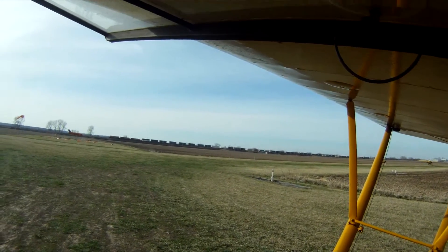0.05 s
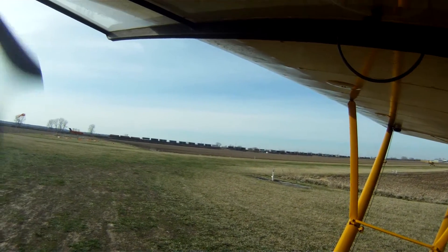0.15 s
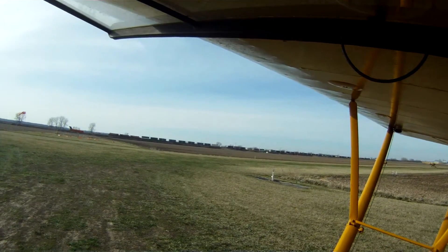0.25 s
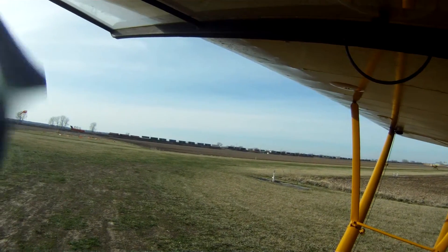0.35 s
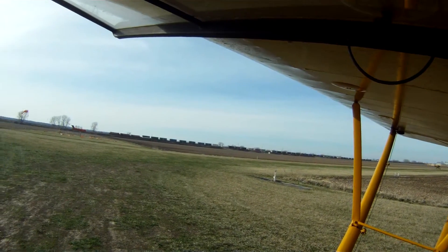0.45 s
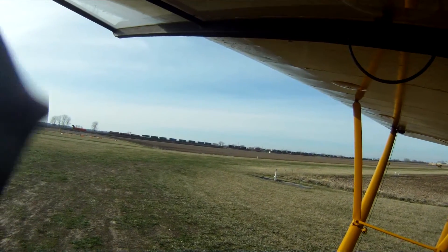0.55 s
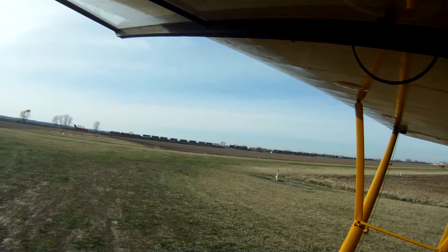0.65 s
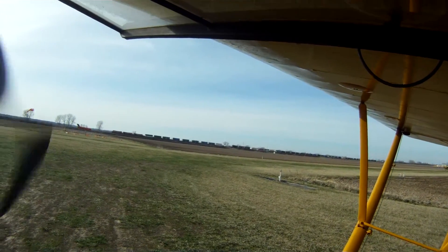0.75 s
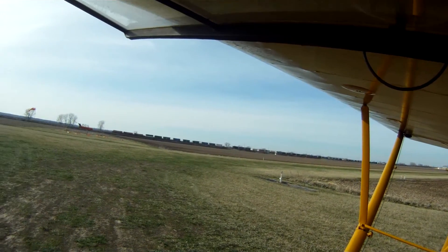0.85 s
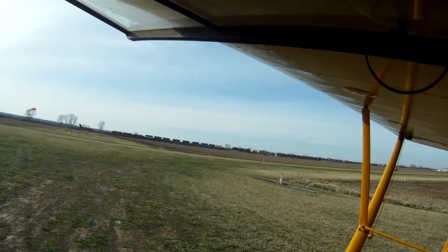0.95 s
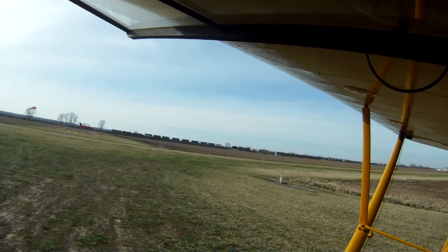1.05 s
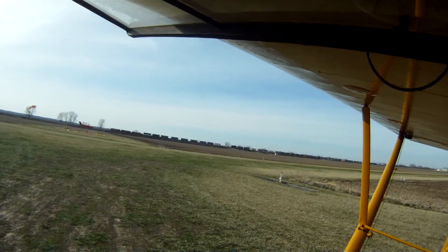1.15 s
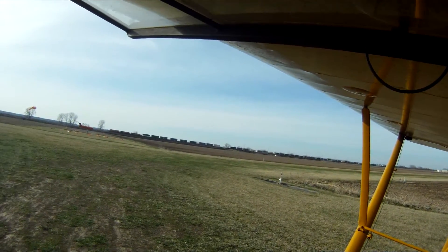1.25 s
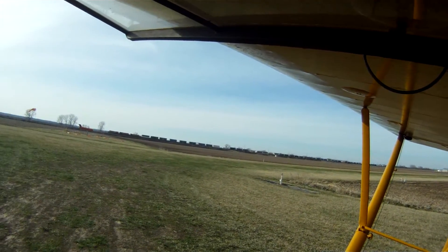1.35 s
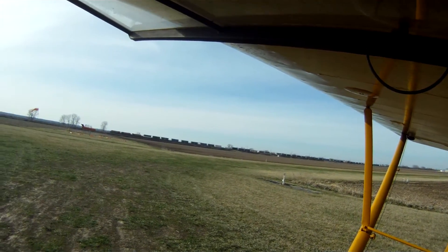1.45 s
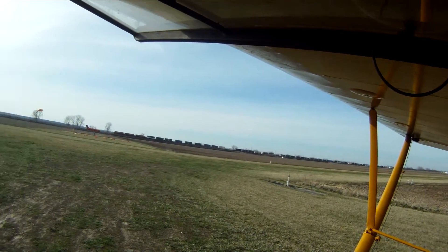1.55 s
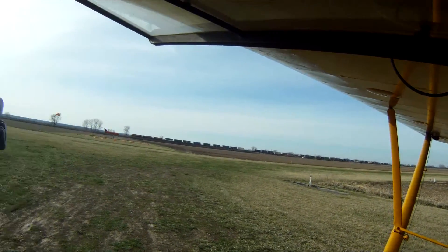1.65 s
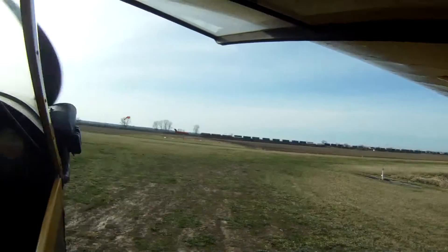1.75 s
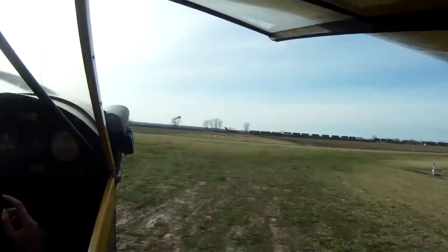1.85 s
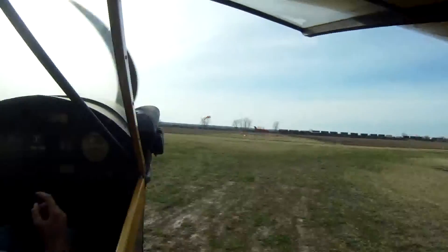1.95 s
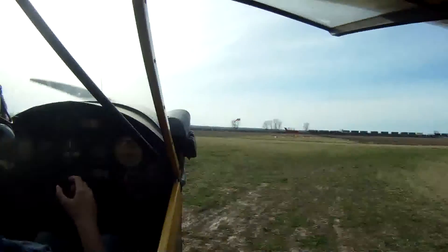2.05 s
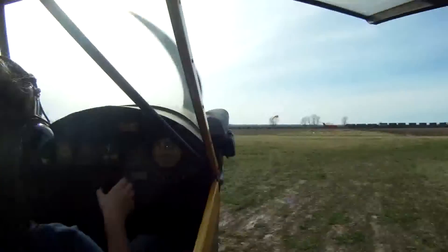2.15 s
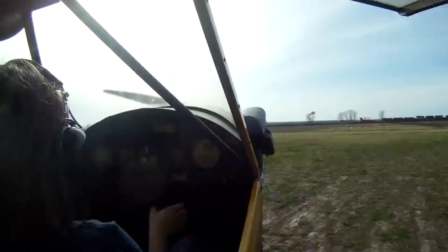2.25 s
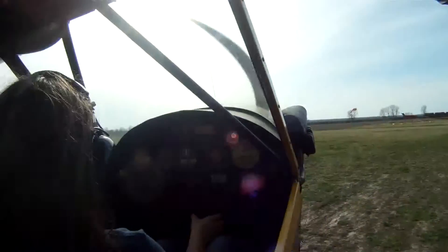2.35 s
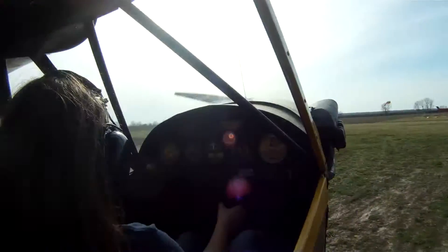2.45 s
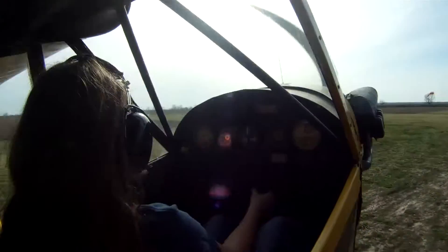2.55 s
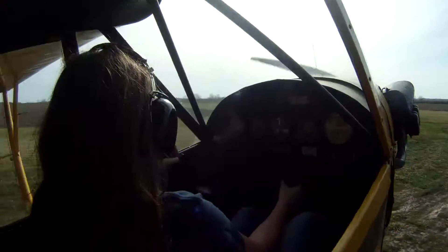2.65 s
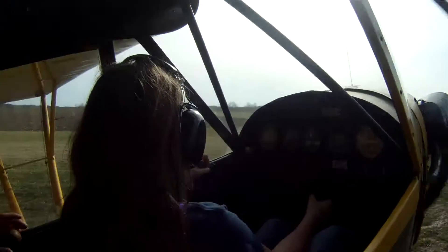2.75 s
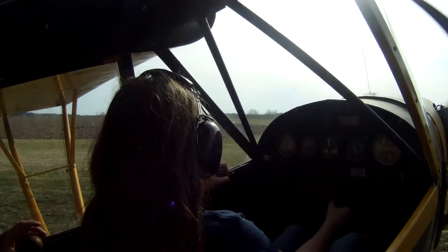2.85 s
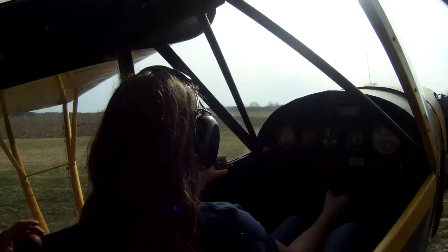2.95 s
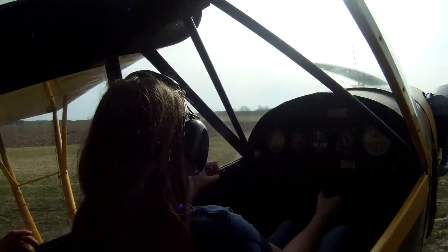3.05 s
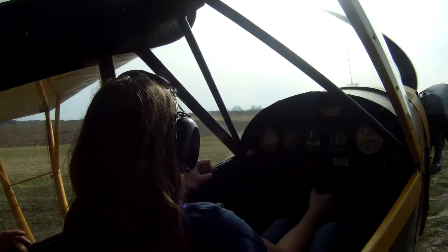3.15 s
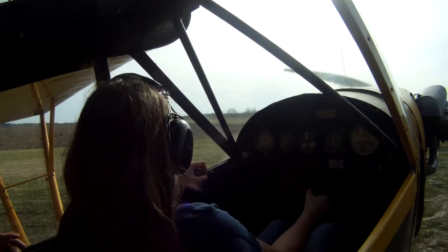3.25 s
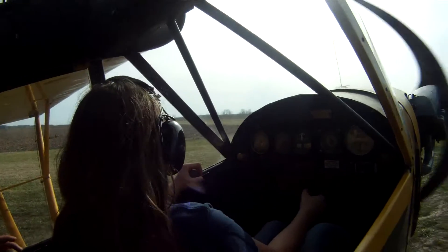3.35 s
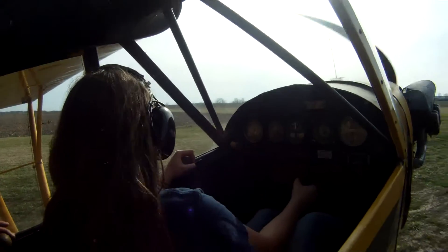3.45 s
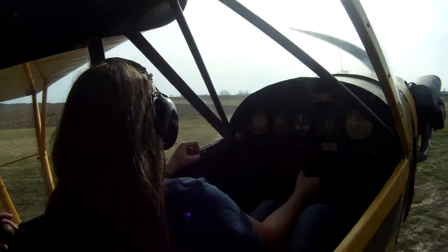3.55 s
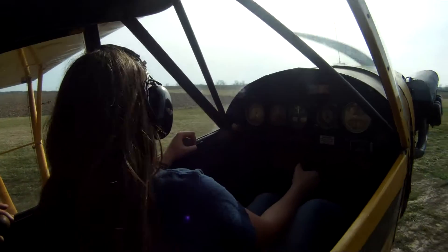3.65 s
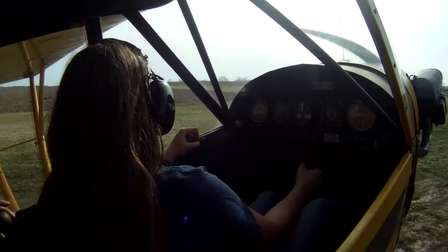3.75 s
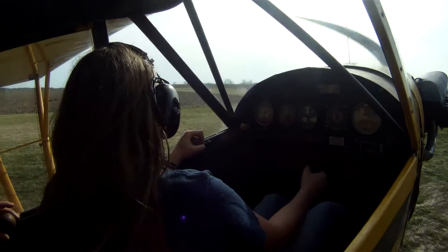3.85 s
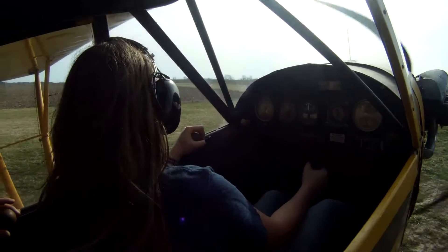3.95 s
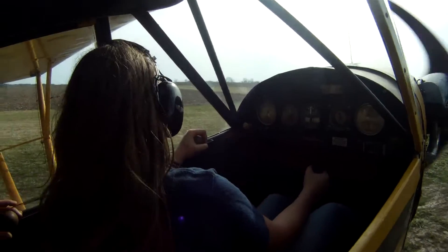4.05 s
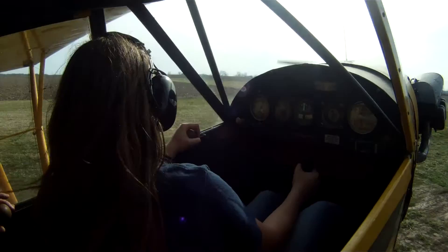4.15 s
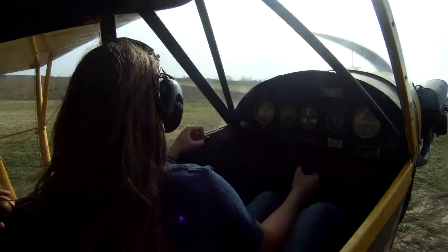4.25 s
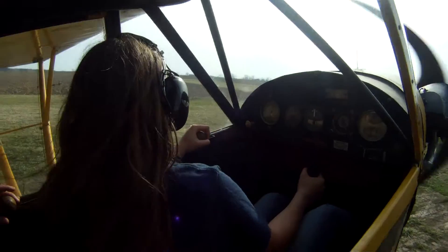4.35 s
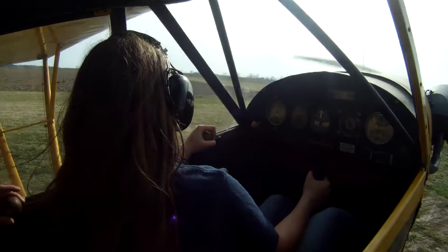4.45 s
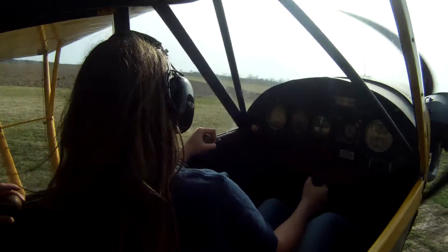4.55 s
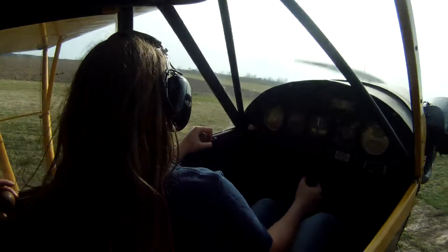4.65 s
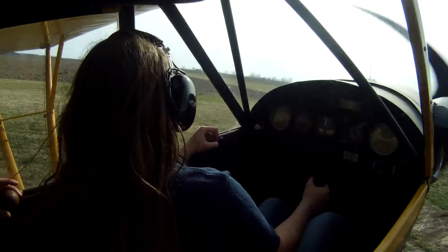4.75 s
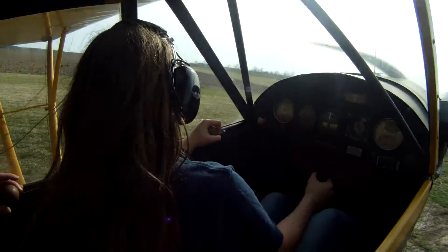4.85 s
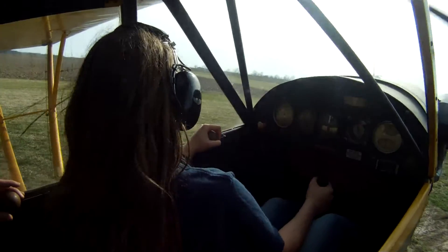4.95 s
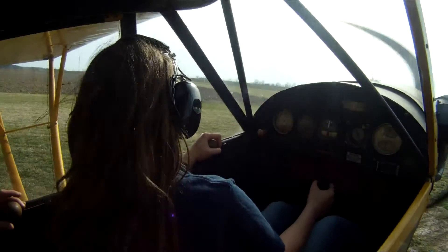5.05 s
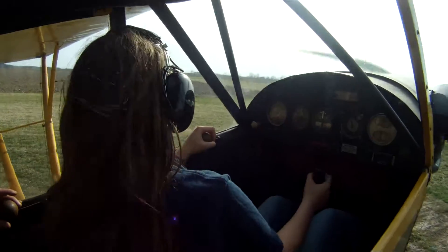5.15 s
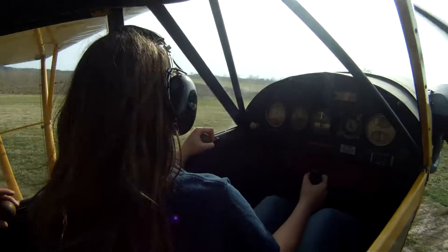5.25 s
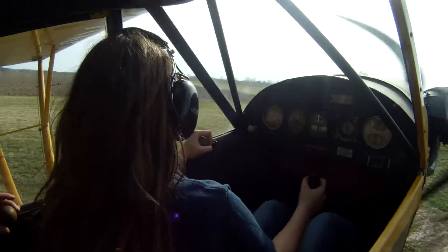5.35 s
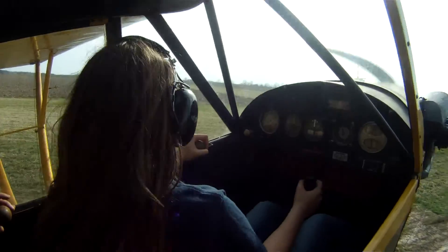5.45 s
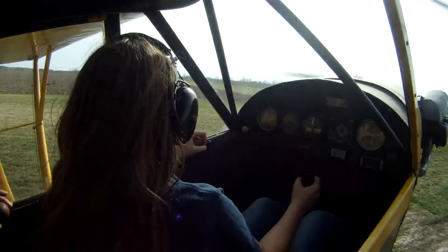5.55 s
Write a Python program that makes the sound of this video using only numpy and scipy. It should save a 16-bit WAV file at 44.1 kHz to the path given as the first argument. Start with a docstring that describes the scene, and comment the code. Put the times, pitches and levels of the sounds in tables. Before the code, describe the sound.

From the open door of a light aircraft, the engine ticks over with a steady throb, faint knocking and rhythmic puffs of propeller air. Then it revs up towards full power, climbing in pitch and loudness. Bass buffeting suddenly hits the microphone, the hiss becomes a coarse, fluttering rush with a breathy whistle in it, and scattered cabin rattles and dull wind thumps break through.

```python
"""On grass, at the open cockpit door of a light aircraft: it idles, then opens up to full throttle.
Each propeller blade throws a slug of air over the microphone, hissing in the resonances of its port
and buffeting the bass. Underneath, the exhaust throbs and every firing knocks in the cabin.
As the speed rises the wash turns rough and gusty: it swishes across the port and sets it singing,
the cabin rattles, and single eddies thump the diaphragm."""
import sys
import numpy as np
from scipy import signal
from scipy.fft import rfft, irfft, next_fast_len
from scipy.io import wavfile

SR = 44100
rng = np.random.default_rng(int(sys.argv[2]) if len(sys.argv) > 2 else 0)


def unload_wav(signal):
    """Save mono or channel-first audio to the path in sys.argv[1] as 16-bit WAV at rate SR, clipped to [-1, 1]."""
    wavfile.write(
        sys.argv[1],
        SR,
        np.round(np.clip(np.atleast_2d(signal).T, -1, 1) * 32767).astype(np.int16),
    )


N = 247401
TIME = np.arange(N) / SR
SIZE = next_fast_len(N + SR // 4)
HZ = np.maximum(np.arange(SIZE // 2 + 1) * SR / SIZE, 1)


def from_db(db):
    """Decibels to gain."""
    return 10 ** (np.asarray(db) / 20)


def rms_one(x):
    """Scale to unit power."""
    return x / np.sqrt(np.mean(x ** 2) + 1e-20)


def eq_curve(points):
    """An EQ curve in dB, its points joined on a log-frequency axis."""
    hz, db = np.transpose(points)
    return np.interp(np.log(HZ), np.log(hz), db)


def bell(hz, width):
    """Power shape of one resonance, 1 on top."""
    return 1 / (1 + (2 * (HZ - hz) / width) ** 2)


def colour(x, db):
    """Play x through a minimum-phase EQ, which rings only after the sound."""
    cepstrum = irfft(np.log(from_db(db)), SIZE)
    cepstrum[1:SIZE // 2] *= 2
    cepstrum[SIZE // 2 + 1:] = 0
    return irfft(rfft(x, SIZE) * np.exp(rfft(cepstrum)), SIZE)[:N]


def drift(hz):
    """A smooth random modulator that rolls off above hz; RMS 1."""
    return rms_one(irfft(rfft(rng.standard_normal(SIZE)) / (1 + (HZ / hz) ** 2), SIZE)[:N])


def bump(centre_s, length_s):
    """A smooth fade in and out, 1 on top."""
    return np.exp(-np.minimum((2 * (TIME - centre_s) / length_s) ** 2, 20))


def fade_in(centre_s, length_s):
    """A smooth rise from 0 to 1."""
    return .5 + .5 * np.tanh(2 * (TIME - centre_s) / length_s)


def engine_speed(idle_hz, full_hz, throttle_s, lag_s):
    """Rate of blade passes, and of the four cylinders' firings: idle, then a glide towards full speed."""
    return full_hz - (full_hz - idle_hz) * np.exp(-np.maximum(TIME - throttle_s, 0) / lag_s)


def blade_throb(passes, phase, depth_db):
    """Tremolo in dB: the flow swings once per blade, reaching depth_db at this phase (0-1) of the pass."""
    return depth_db * np.cos(2 * np.pi * (passes - phase))


def slug_edge(passes, phase, width):
    """An edge of each slug shears the air: one short swell per pass, 1 on top."""
    return np.exp(-(np.sin(np.pi * (passes - phase)) / (np.pi * width)) ** 2)


def turbulence(swing_db, flicker_db, flicker_hz):
    """Churning air: noise whose level follows swing_db, with a random flicker on top."""
    return rng.standard_normal(N) * from_db(swing_db + flicker_db * drift(flicker_hz))


# Tone of gentle and of rough flow before the port: f/Hz, level/dB
GENTLE_FLOW_EQ = [(100, -39), (210, -7.5), (300, 2), (450, -2), (900, -8.5), (1700, -13.5), (2900, -15),
                  (4500, -17), (8000, -20), (12000, -27), (15300, -25)]
ROUGH_FLOW_EQ = [(100, -10.5), (220, 3), (400, 2.5), (900, 1), (1700, -6), (2900, -6), (4500, -8),
                 (8000, -13), (12000, -24.5), (15300, -24)]
# Peaks and notches of the microphone port: f/Hz, width/Hz, gentle-flow gain/dB, rough-flow gain/dB
PORT_RESONANCES = [(584, 450, 7, -4), (1257, 460, 18, 5.5), (2108, 1060, 26, 15), (3683, 810, 12.5, 7),
                   (5110, 570, 7, 2.5), (5996, 610, -10.5, -17.5), (6880, 630, 6.5, 2.5),
                   (8410, 730, 10.5, 8.5), (9886, 990, 23, 16.5), (10740, 290, 14.5, 8),
                   (12160, 390, -8, -22), (13640, 340, 11.5, 2.5), (14150, 1670, 17, 19)]
def port_colours():
    """The port stamps its resonances on the air: EQ curves in dB for gentle and for rough flow."""
    gentle_peaks = sum(db * bell(hz, width) for hz, width, db, _ in PORT_RESONANCES)
    rough_peaks = sum(db * bell(hz, width) for hz, width, _, db in PORT_RESONANCES)
    return eq_curve(GENTLE_FLOW_EQ) + gentle_peaks, eq_curve(ROUGH_FLOW_EQ) + rough_peaks


# Breathy tones of the port singing in fast air: f/Hz, width/Hz, relative level/dB
PORT_WHISTLES = [(1230, 130, 0), (2190, 260, 0), (3641, 130, -1), (8355, 170, -8)]
def port_hiss(passes, roughness, singing_db):
    """Gentle flow chugs in the mids and fizzes on top; rough flow is broader and sets the port singing."""
    gentle_eq, rough_eq = port_colours()
    mids = 1 / (1 + (HZ / 1750) ** 8)
    slug_db = blade_throb(passes, phase=.7, depth_db=3.7)
    # each slug has a front and a back, so the treble beats twice per pass
    edges_db = 5.4 * slug_edge(passes, phase=.53, width=.15) + 3.4 * slug_edge(passes, .97, .14)
    chug = turbulence(slug_db, flicker_db=-0.05, flicker_hz=630)
    fizz = turbulence(edges_db, flicker_db=0.7, flicker_hz=360)
    gentle = colour(chug, gentle_eq + 10 * np.log10(mids))
    gentle += colour(fizz, gentle_eq + 10 * np.log10(1.001 - mids))
    rough_slug_db = blade_throb(passes, phase=.66, depth_db=1.9) + .4 * drift(25)
    rough_flow = turbulence(rough_slug_db, flicker_db=2.1, flicker_hz=400)
    rough = colour(rough_flow, rough_eq)
    whistle_power = sum(from_db(db) ** 2 * bell(hz, width) ** 2 for hz, width, db in PORT_WHISTLES)
    song = colour(rough_flow, 10 * np.log10(whistle_power))
    hiss = np.sqrt(1 - roughness) * rms_one(gentle) + np.sqrt(roughness) * rms_one(rough)
    return rms_one(hiss + from_db(singing_db) * rms_one(song))


# Tone of the wind on the diaphragm: f/Hz, level/dB
BUFFET_EQ = [(8, -43), (22, -21), (40, -3), (72, -3.5), (105, -6.5), (150, -10), (250, -14.5), (450, -31),
             (1000, -60.5), (4000, -87)]
def buffet(passes, roughness):
    """Large eddies rumble on the diaphragm; clumps of small ones flutter, a bit more in rough flow."""
    large = turbulence(blade_throb(passes, phase=0.25, depth_db=-1.4), flicker_db=-0.5, flicker_hz=59)
    small = turbulence(2.24 * drift(13.4), flicker_db=2.5, flicker_hz=86)
    lows = 1 / (1 + (HZ / 150) ** 6)
    rumble = colour(large, eq_curve(BUFFET_EQ) + 10 * np.log10(lows))
    flutter = colour(rms_one(small), eq_curve(BUFFET_EQ) + 10 * np.log10(1.001 - lows))
    return rms_one(rumble + from_db(-2.2 * (1.5 - roughness)) * flutter)


# Tone of the pulses through the exhaust pipe: f/Hz, level/dB
EXHAUST_EQ = [(5, -60), (25, 8), (50, -8), (75, 3), (100, -6), (125, -28), (150, -1), (200, -28.5),
              (800, -36), (4000, -81)]
def exhaust(passes, uneven_db):
    """Each firing sends a pressure pulse of its own strength down the pipe: a low throb."""
    firings = np.diff(np.floor(passes + 0.4094), prepend=0)
    pulses = firings * from_db(uneven_db * drift(60))
    return rms_one(colour(pulses, eq_curve(EXHAUST_EQ)))


def firing_knocks(passes, phase, level_db, spread_db):
    """Every firing knocks, each with its own strength: cues of t/s, relative level/dB."""
    times = np.interp(np.arange(int(passes[-1])) + phase, passes, TIME)
    return list(zip(times, level_db + spread_db * rng.standard_normal(len(times))))


# The loudest rattles in the cabin: t/s, relative level/dB
CABIN_RATTLES = [(2.392, -16), (2.557, -14), (2.632, -13.5), (3.1043, -10), (3.2565, -4), (3.342, -9.5),
                 (3.6443, -9), (4.196, -5.5), (4.4034, 0.5), (4.7601, -12), (5.1825, -6)]
def cabin_rattles(knocks, decay_s, ring_hz, ring_db):
    """Rattles and knocks are short dry contacts that mostly ring the port's main resonance."""
    gentle_eq, _ = port_colours()
    ring_eq = gentle_eq + ring_db * bell(ring_hz, width=200)
    age = TIME[:SR // 50]
    bursts = np.zeros(N + len(age))
    for t, db in list(CABIN_RATTLES) + knocks:
        start = round(t * SR)
        burst = rng.standard_normal(len(age)) * np.exp(-age / decay_s)
        bursts[start:start + len(age)] += from_db(db) * burst
    return colour(bursts, ring_eq) / np.sqrt(np.mean(from_db(ring_eq) ** 2))


# Big gusts and lulls in the wash: centre t/s, length/s, hiss gain/dB, bass gain/dB
BIG_GUSTS = [(.92, .08, 2.5, 1), (2.0, 0.78, -2.5, 0.5), (2.675, 0.074, 3, 3.5), (2.795, 0.033, 3, 8),
             (3.28, 0.32, 1.5, -0.5), (3.975, 0.47, -1.5, -1.5), (4.189, 0.019, -6.5, -5),
             (4.492, 0.14, 3, -1), (4.738, 0.022, -4, -4), (4.787, 0.016, 5.5, 3), (4.86, 0.013, -7.5, 1),
             (4.92, 0.023, 4.5, -9), (5.009, 0.015, -5.5, 2), (5.088, 0.027, -7.5, 3.5),
             (5.129, 0.036, 3, 4), (5.163, 0.029, -11.5, -5.5), (5.212, 0.01, -10, 3),
             (5.353, 0.016, 5.5, 7), (5.369, 0.026, -7, -3), (5.422, 0.037, 4, 6.5),
             (5.505, 0.012, -6.5, 2), (5.601, 0.027, -8, -1)]
def gusts(octaves, rate_hz):
    """Gusts ride the hiss and bass faders, in dB: big ones over small ones that deepen with speed."""
    small_db = (0.8 + .5 * octaves) * drift(rate_hz)
    bass_lumps_db = 0.3 * octaves * drift(rate_hz)
    big_hiss_db = sum(db * bump(t, length) for t, length, db, _ in BIG_GUSTS)
    big_bass_db = sum(db * bump(t, length) for t, length, _, db in BIG_GUSTS)
    return small_db + big_hiss_db, small_db + bass_lumps_db + big_bass_db


# The wash sweeping across the turning port: centre t/s, length/s, f/Hz, width/Hz, level/dB
PORT_SWISHES = [(2.211, 0.012, 6000, 3000, -38.5), (2.54, .02, 6000, 3030, -38),
                (2.692, .11, 1900, 700, -32.5), (2.714, 0.12, 11500, 7000, -41),
                (3.163, 1, 1870, 400, -33.5)]
def swishes():
    """Air crossing the port at a new angle briefly favours one band."""
    _, rough_eq = port_colours()
    flow = rfft(rng.standard_normal(SIZE)) * from_db(rough_eq)
    out = np.zeros(N)
    for t, length, hz, width, db in PORT_SWISHES:
        band = rms_one(irfft(flow * bell(hz, width), SIZE)[:N])
        out += from_db(db) * bump(t, length) * band
    return out


# Single eddies hitting the diaphragm: t/s, relative level/dB
EDDY_HITS = [(2.576, -14), (2.785, -11), (3.432, -9), (4.411, -9.5), (4.81, -13), (4.925, -5),
             (5.143, -5.5), (5.267, -5), (5.546, -6.5)]
def eddy_thumps(hz, decay_s, puff_hz, puff_db):
    """An eddy lands as a low swing that dies within two cycles, with a dull puff."""
    puff_eq = 20 * np.log10(bell(puff_hz, width=510))
    puff = from_db(puff_db) * rms_one(colour(rng.standard_normal(N), puff_eq))
    out = np.zeros(N)
    for t, db in EDDY_HITS:
        span = slice(round(t * SR), round(t * SR) + SR // 12)
        age = TIME[span] - t
        out[span] += from_db(db) * (np.sin(2 * np.pi * hz * age) + puff[span]) * np.exp(-age / decay_s)
    return out


def scene():
    """The mono mix: engine speed paces and lifts hiss, buffet and exhaust; hits and swishes sit on top."""
    idle_hz = 24.86
    speed = engine_speed(idle_hz, full_hz=49.5, throttle_s=2.6, lag_s=1.14)
    passes = np.cumsum(speed) / SR
    octaves = np.log2(speed / idle_hz)
    # the microphone turns towards the cabin, into rougher flow; speed roughens it further
    roughness = np.clip(0.41 * fade_in(centre_s=2.04, length_s=.4) + 0.56 * octaves, 0, 1)
    # the microphone swings into the wash: the bass steps up sharply
    surge_db = 7.5 * fade_in(centre_s=2.57, length_s=0.054)
    hiss_gust_db, bass_gust_db = gusts(octaves, rate_hz=17)
    # faders: a level at idle, plus so many dB per octave of engine speed
    hiss_db = -33 + 15 * octaves + hiss_gust_db
    bass_db = -43 + 17 * octaves + surge_db + bass_gust_db
    throb_db = -46.5 + 13 * octaves
    hiss = from_db(hiss_db) * port_hiss(passes, roughness, singing_db=-58 + 51 * octaves)
    wind = from_db(bass_db) * buffet(passes, roughness)
    throb = from_db(throb_db) * exhaust(passes, uneven_db=3.5)
    knocks = firing_knocks(passes, phase=.58, level_db=-26.5, spread_db=3.5)
    cabin = from_db(-5) * cabin_rattles(knocks, decay_s=0.0018, ring_hz=2000, ring_db=6.5)
    thumps = from_db(-2.0) * eddy_thumps(hz=76.6, decay_s=0.012, puff_hz=201, puff_db=-10.5)
    return (hiss + swishes() + wind + throb + cabin + thumps)[None]


def record(dry):
    """A soft clip rounds the strongest peaks, then a steep low-pass cuts the top."""
    ceiling, cutoff_hz = .95, 15400
    rounded = dry / (1 + (dry / ceiling) ** 4) ** .25
    return signal.sosfilt(signal.ellip(12, .1, 80, cutoff_hz, fs=SR, output="sos"), rounded)


dry = scene()
out = record(dry)
unload_wav(out)
```